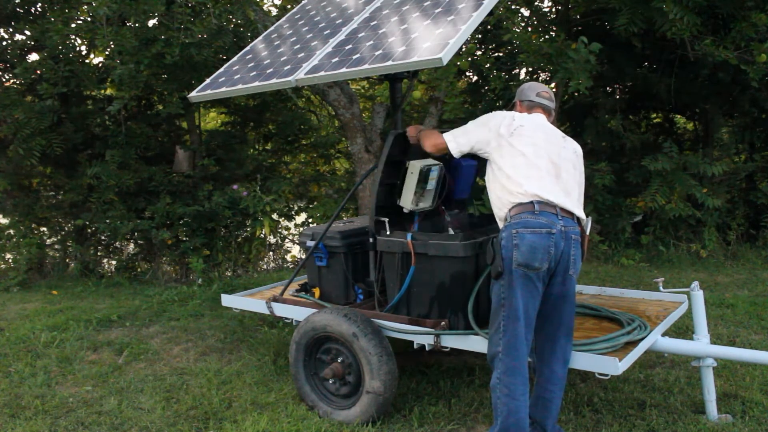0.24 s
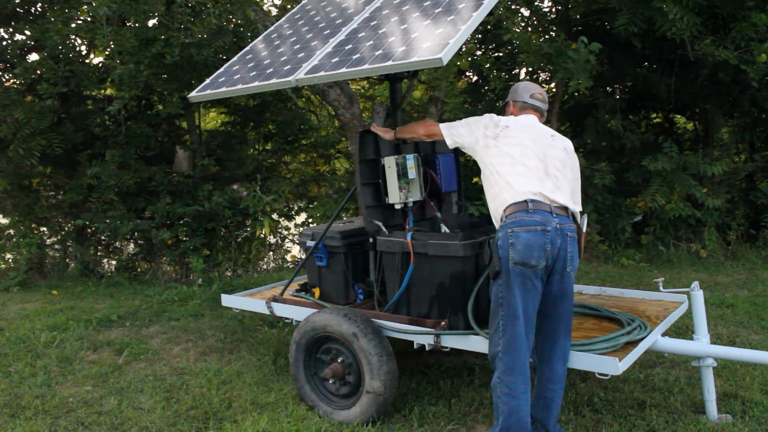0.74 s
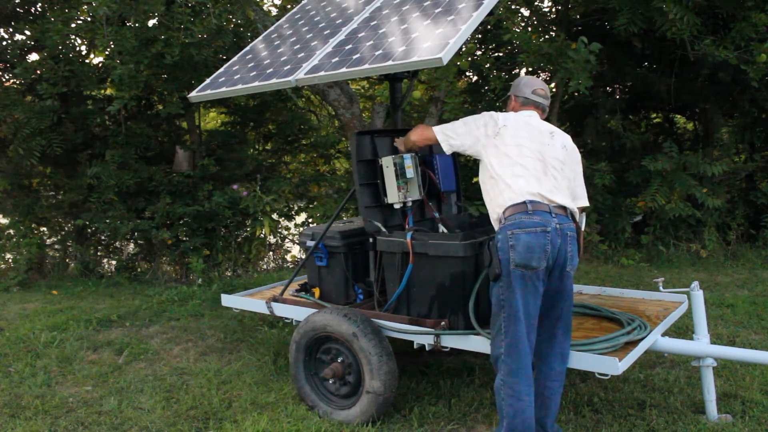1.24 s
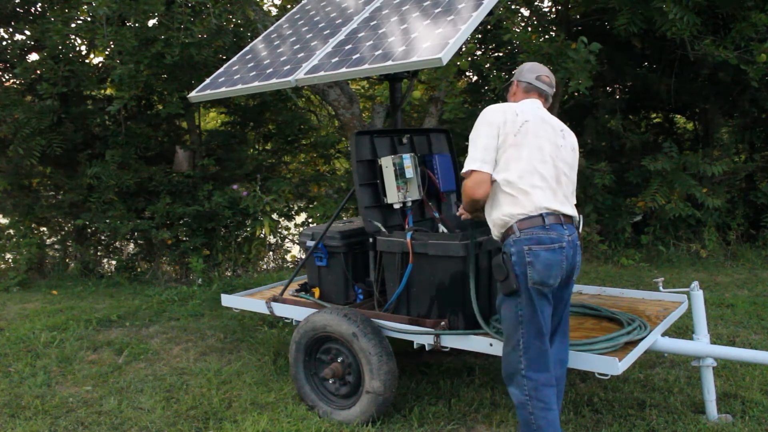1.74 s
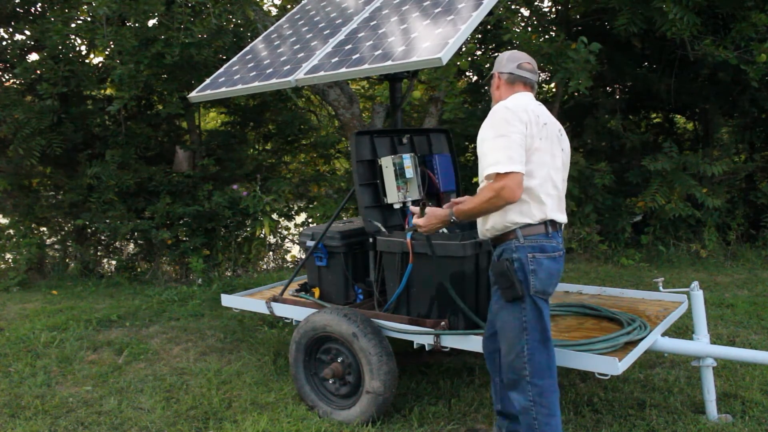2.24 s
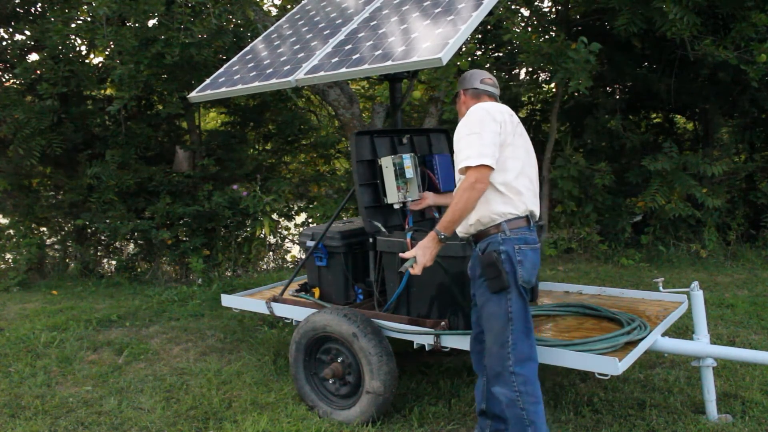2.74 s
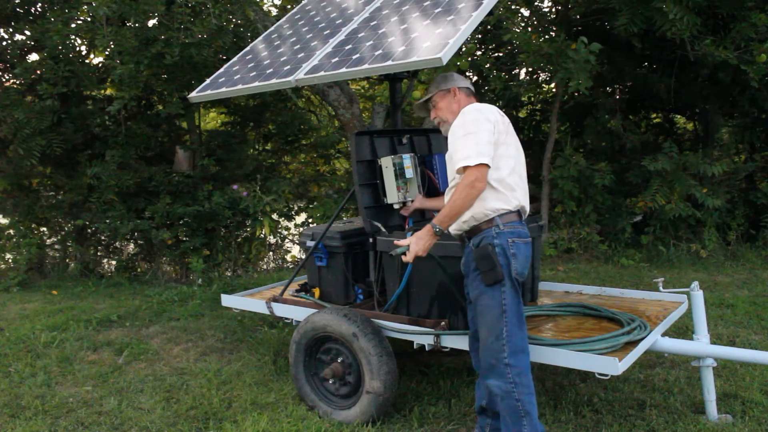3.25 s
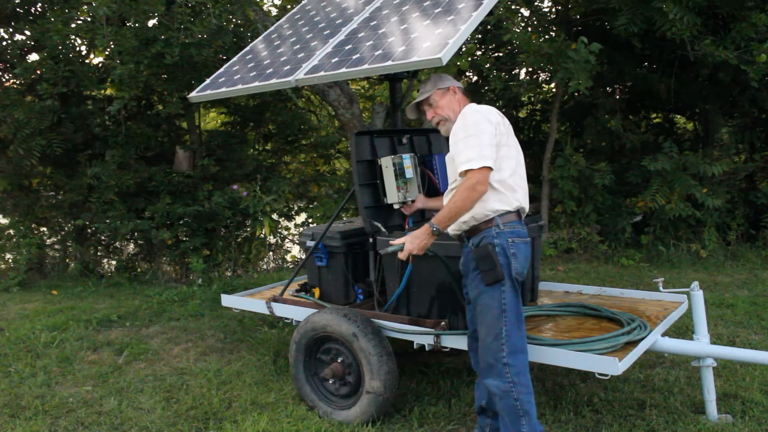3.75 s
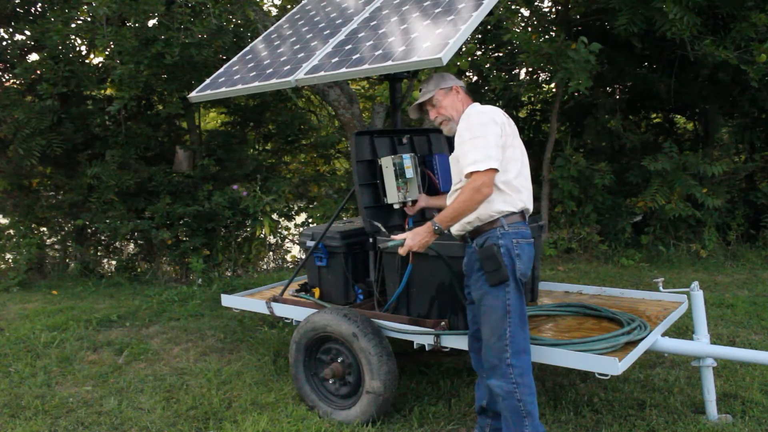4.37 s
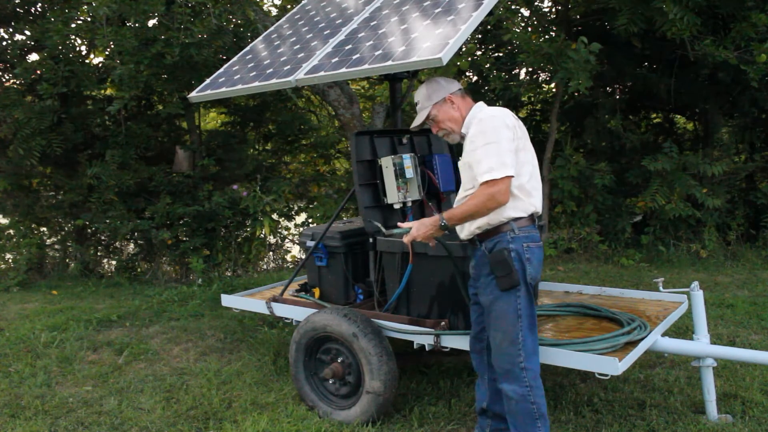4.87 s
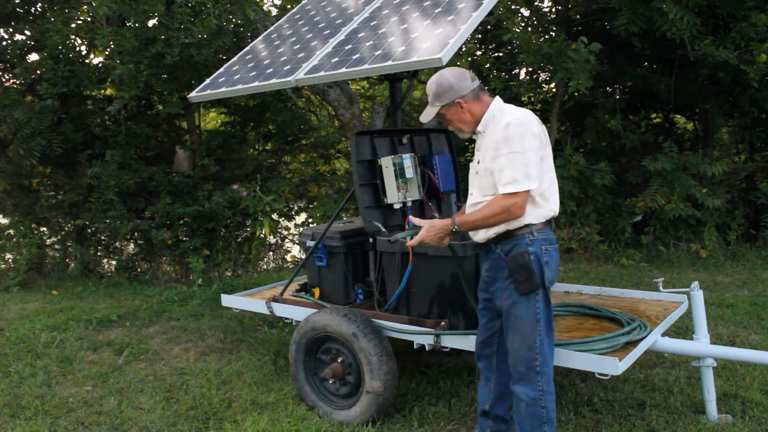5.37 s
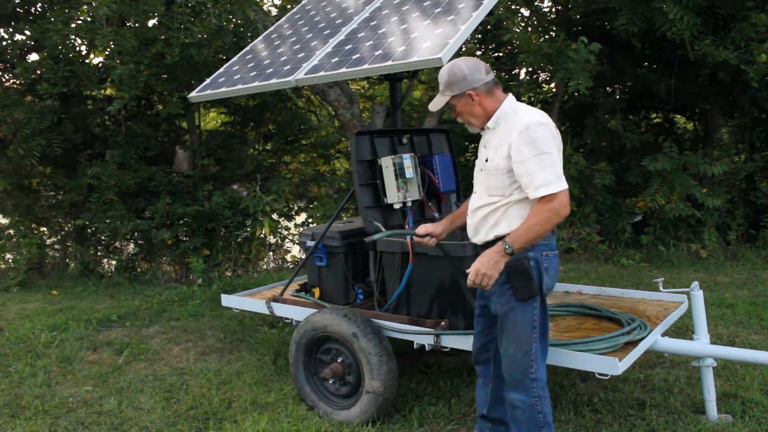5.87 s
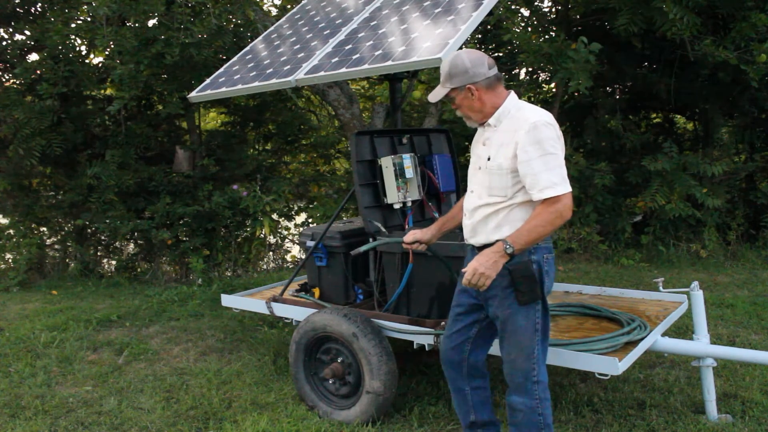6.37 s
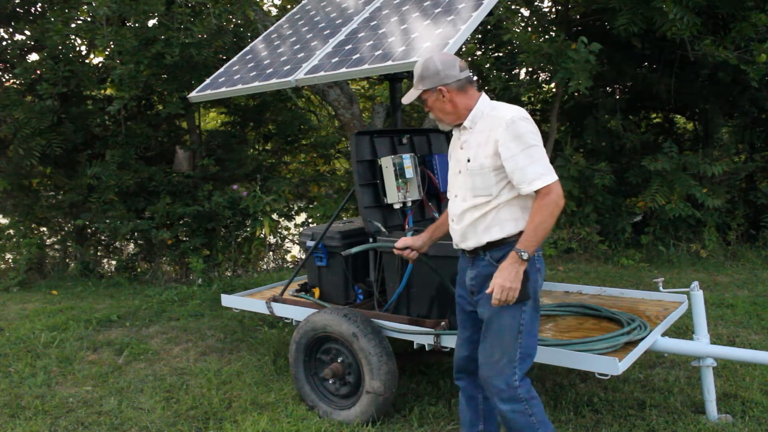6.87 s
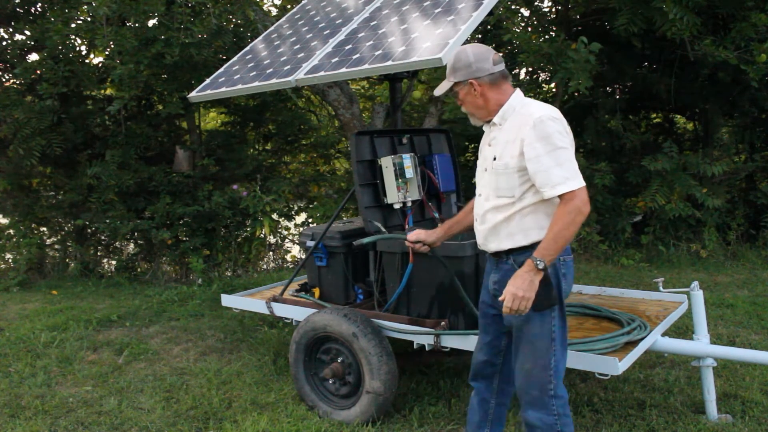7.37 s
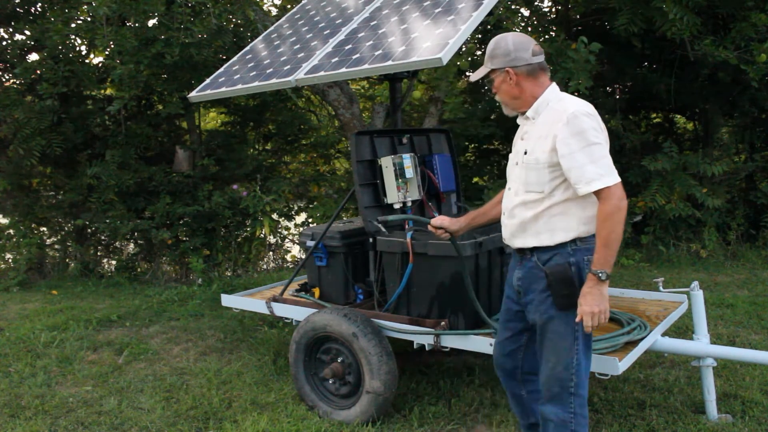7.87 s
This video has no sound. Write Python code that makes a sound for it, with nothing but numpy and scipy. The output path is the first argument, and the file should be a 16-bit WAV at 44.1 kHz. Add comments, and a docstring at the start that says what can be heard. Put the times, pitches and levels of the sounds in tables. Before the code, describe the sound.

Crickets and katydids sing steadily outdoors while a plastic box lid knocks open, followed by a few light snaps and rustles.

```python
"""Dusk on a lawn, heard through one microphone. From the start, crickets and katydids scrape their
wings in the hedge, over evening air and a far road; thin peeps come now and then from the trees.
A man swings open the lid of a plastic battery box on a trailer: the hinge rubs and the box knocks.
Then a hose fitting snaps, his clothes and shoes rustle, and the hose creaks faintly as he twists it.
Near the end a low hum passes far away, followed by a few more snaps and knocks."""
import sys
import numpy as np
from scipy import signal
from scipy.fft import rfft, irfft, next_fast_len
from scipy.io import wavfile

SR = 44100
rng = np.random.default_rng(int(sys.argv[2]) if len(sys.argv) > 2 else 0)


def pcm_store(signal):
    """Save signal as 16-bit PCM."""
    levels = np.round(np.clip(np.atleast_2d(signal), -1, 1) * 32767)
    wavfile.write(sys.argv[1], SR, levels.astype(np.int16).T)


N = 357651
TIME = np.arange(N) / SR


def gain_of(db):
    return 10 ** (np.asarray(db) / 20)


def unit_power(x):
    return x / np.sqrt(np.mean(x ** 2) + 1e-20)


def add(mix, start_s, sound):
    part = mix[max(round(start_s * SR), 0):][:len(sound)]
    part += sound[:len(part)]


def sine(hz):
    """A tone that follows a changing pitch."""
    return np.sin(2 * np.pi * np.cumsum(hz) / SR)


def noise(spectrum):
    """Noise of unit power, shaped by rows of pitch_hz, relative_db."""
    size = next_fast_len(N)
    hz, db = np.transpose(spectrum)
    shape = gain_of(np.interp(np.log(np.fft.rfftfreq(size, 1 / SR) + 1), np.log(hz), db))
    return unit_power(irfft(rfft(rng.standard_normal(size)) * shape, size)[:N])


def wander(per_s):
    """A random drift that heads for a new value per_s times a second."""
    return np.interp(TIME * per_s, np.arange(2048), rng.standard_normal(2048))


def band(x, low_hz, high_hz, order=2):
    return signal.sosfilt(signal.butter(order, [low_hz, high_hz], "band", fs=SR, output="sos"), x)


def hedge(x, tail_s, tail_db):
    """Leaves and trunks scatter a sound into a short tail that fades by 60 dB in tail_s."""
    t = TIME[:SR // 2]
    tail = rng.standard_normal(len(t)) * gain_of(-60 * t / tail_s)
    return x + gain_of(tail_db) * signal.oaconvolve(x, tail / np.linalg.norm(tail))[:N]


def evening_air(level_db=-44.5):
    """A steady hiss: the air and the blur of the farthest insects."""
    # the tone of the hiss: pitch_hz, relative_db
    spectrum = [(25, -30), (60, -4.5), (150, -3), (450, -4.5), (1200, -8), (2500, -10.5), (3800, -10.5),
                (4500, 4), (5600, -4.5), (6600, -8.5), (7600, 13), (9300, 3), (10500, -8.5), (16000, -28)]
    return gain_of(level_db) * noise(spectrum)


def traffic(road_db=-73.5):
    """A far road rumbles, swelling as each vehicle goes by."""
    # passing vehicles: nearest_s, swell_s, level_db
    passes = [(0.1, 1.35, -59.5), (3.65, 0.72, -63.5), (8.2, 0.76, -64.5)]
    power = gain_of(road_db) ** 2
    for nearest_s, swell_s, db in passes:
        power += gain_of(db) ** 2 * np.exp(-((TIME - nearest_s) / swell_s) ** 2)
    rumble = noise([(50, -18), (110, -3.5), (160, 4), (230, -6), (500, -11), (2000, -42.5)])
    return np.sqrt(power) * rumble


def wing_strokes(cycles, top_hz, fall_hz, share):
    """A scraper slows along the wing's ridges for a share of each cycle, so each note falls."""
    progress = np.minimum(cycles % 1 / share, 1)
    swell = np.minimum(2 * np.sin(np.pi * progress), 1)
    return swell * sine(top_hz - fall_hz * progress), progress


def chirp_count(first_s, start_per_s, end_per_s):
    """Chirps sung so far by a cricket whose pace changes evenly."""
    return np.cumsum(np.linspace(start_per_s, end_per_s, N)) / SR - first_s * start_per_s


def near_cricket(chirps, top_hz, fall_hz, share, start_db, end_db):
    """A cricket scrapes its wings close by; each chirp flutters, falls and fades."""
    notes, progress = wing_strokes(chirps, top_hz + 55 * wander(220), fall_hz, share)
    notes *= gain_of(3 * wander(110) - 9 * progress)
    return gain_of(np.linspace(start_db, end_db, N)) * unit_power(hedge(notes, tail_s=.075, tail_db=0))


def chirp_swells(chirps, share):
    """The loudness rises, holds and falls around each whole count of chirps."""
    distance = np.abs((chirps + .5) % 1 - .5)
    return unit_power(np.clip(2 - 4 * distance / share, 0, 1))


def field_cricket(swell, top_hz, fall_hz=700):
    """Each chirp is a swell of a few wing strokes, each a falling note."""
    cycles = TIME * 22 * rng.uniform(.8, 1.2) + .4 * wander(4)
    notes, progress = wing_strokes(cycles, top_hz + 25 * wander(60), fall_hz * (cycles % 1 + .3), .72)
    return swell * unit_power(notes * gain_of(2 * wander(20) - 5 * progress ** 2))


def field_crickets(crowd_size=6):
    """Three crickets keep their own paces, a nearer one chirps unevenly, and a crowd sings behind."""
    # the three crickets: first_chirp_middle_s, start_chirps_per_s, end_chirps_per_s, top_pitch_hz
    singers = [(.055, 2.588, 2.588, 5110), (.385, 2.17, 3.03, 5080), (.31, 1.685, 1.685, 4720)]
    # the nearer one's chirps: middle_s, relative_db
    lone_chirps = [(.35, -54), (.88, -51), (2.68, -48.5), (3.27, -46), (3.75, -48), (4.38, -47),
                   (4.92, -49), (5.72, -47), (6.34, -51), (6.93, -50), (7.95, -48.5)]
    out, lone_swell, chirp_s = np.zeros(N), np.zeros(N), .16
    for *pace, top_hz in singers:
        out += gain_of(-56.5) * field_cricket(chirp_swells(chirp_count(*pace), share=.45), top_hz)
    one_swell = signal.windows.tukey(round(chirp_s * SR), .7)
    for middle_s, db in lone_chirps:
        add(lone_swell, middle_s - chirp_s / 2, gain_of(db) * one_swell)
    out += field_cricket(lone_swell, top_hz=4740, fall_hz=329.3)
    for k in range(crowd_size):
        swell = chirp_swells(TIME * rng.uniform(2.2, 3.4) + rng.random(), share=1.15)
        song = field_cricket(swell, top_hz=4998 - 330 * k / crowd_size)
        out += gain_of(-51) / np.sqrt(crowd_size) * song
    return hedge(out, tail_s=.2, tail_db=-2) / np.sqrt(2)


def buzz(strokes_per_s, sharpness):
    """The swell of each wing stroke in a katydid's buzz."""
    cycles = TIME * strokes_per_s + .0514 * wander(1.1)
    return unit_power(np.exp(sharpness * np.cos(2 * np.pi * cycles)))


def katydids(conehead_db=-47, meadow_db=-48, stop_s=3.97):
    """Two conehead katydids buzz their wings without pause; a meadow katydid whirrs and stops."""
    # the rasp of each kind's wings: pitch_hz, relative_db
    conehead_rasp = [(7000, -41), (9000, -4.5), (10500, -5.5), (12000, 1.5), (13200, 3.5), (14400, 6),
                     (15600, 2), (16500, -32)]
    meadow_rasp = [(9000, -45), (11500, -5), (13000, -1), (14600, 3.5), (15600, 6), (16500, -17)]
    coneheads = noise(conehead_rasp) * buzz(177.8, .25) + noise(conehead_rasp) * buzz(184.1, .27)
    meadow = noise(meadow_rasp) * buzz(30.9, .96) * np.clip((stop_s - TIME) / .02, 0, 1)
    return gain_of(conehead_db) * coneheads + gain_of(meadow_db) * meadow


def choir(hz, spread_hz, fall_hz, strokes_per_s, count):
    """Several trilling crickets, each with its own pitch and pace."""
    out = np.zeros(N)
    for offset in np.linspace(-1, 1, count):
        cycles = TIME * strokes_per_s * rng.uniform(.8, 1.2) + rng.random() + .3 * wander(12)
        top_hz = hz + offset * spread_hz + fall_hz / 2 + 45 * wander(60)
        notes, _ = wing_strokes(cycles, top_hz, fall_hz, share=.7)
        out += notes / (1 + offset ** 2)
    return unit_power(hedge(out, tail_s=.4, tail_db=-2))


def far_crickets():
    """Five choirs of far crickets blend into a steady ringing."""
    # choirs: pitch_hz, spread_hz, fall_per_stroke_hz, typical_strokes_per_s, level_db
    choirs = [(3090, 30, 120, 48, -69), (3324, 40, 100, 55, -69.5), (5990, 220, 260, 40, -64),
              (7833, 250, 450, 42, -45.5), (9090, 480, 650, 46, -48.5)]
    return sum(gain_of(db) * choir(*song, count=6) for *song, db in choirs)


def high_trill():
    """Two crickets trill very high and grow louder."""
    # the trill's loudness: time_s, level_db
    levels = [(0, -61), (4.4, -57.5), (5.2, -54.5), (6.5, -50.5), (8.11, -50)]
    swell = gain_of(np.interp(TIME, *np.transpose(levels)))
    return swell * choir(hz=9850, spread_hz=40, fall_hz=220, strokes_per_s=60, count=2)


def friction(rubs, spectrum, grain_db):
    """Strokes of uneven, grainy rubbing, from two places of contact."""
    swell = np.zeros(N)
    for start_s, length_s, db in rubs:
        add(swell, start_s, gain_of(db) * signal.windows.tukey(round(length_s * SR), .7))
    contacts = [noise(spectrum) * gain_of(grain_db * np.tanh(wander(170))) for _ in range(2)]
    return swell * unit_power(sum(contacts))


def hinge():
    """The lid rubs on its hinge as it swings."""
    # rubs: start_s, length_s, level_db
    rubs = [(0.14, 0.13, -55), (0.37, 0.13, -48.5), (0.68, .12, -53.5), (0.79, 0.086, -53),
            (0.93, 0.1, -51.5), (1.10, 0.085, -57.5)]
    spectrum = [(50, -22), (170, -4), (300, -2), (450, .5), (750, -10.5), (1500, -12.5),
                (5000, -40), (12000, -50)]
    return friction(rubs, spectrum, grain_db=8)


def peeps(length_s=.053, rise_hz=780):
    """Short rising notes from deep in the trees."""
    # thin peeps: start_s, start_pitch_hz, level_db
    notes = [(0.28, 6200, -57), (1.17, 6200, -54), (2.97, 6300, -58), (3.10, 6200, -58), (3.31, 3400, -66),
             (3.665, 6260, -55), (5.37, 3500, -57), (5.499, 6250, -57)]
    out, size = np.zeros(N), round(length_s * SR)
    for start_s, hz, db in notes:
        add(out, start_s, gain_of(db) * np.hanning(size) * sine(hz + np.linspace(0, rise_hz, size)))
    return hedge(out, tail_s=.13, tail_db=0)


def box_knocks(lid_rise_s=.0011, wall_rise_s=.0034, echo_s=.0088):
    """The stiff lid clacks and rattles, its edge ticks, and the hollow walls answer with a thud."""
    # blows on the box: start_s, thud_db, clack_db, clack_pitch_hz, tick_db
    blows = [(0.399, -40, -47, 1390, -48), (0.574, -35.5, -36.5, 1480, -33), (0.888, -18.5, -28, 1140, -31),
             (0.931, -32.5, -62, 1400, -34.5), (0.965, -46, -40, 1380, -39),
             (1.3865, -30.5, -28, 1350, -52), (1.399, -26, -19.5, 1305, -31), (1.6737, -52, -21, 1310, -65),
             (1.6772, -19, -7.5, 1347, -18), (3.469, -40.5, -39, 980, -46), (3.660, -50, -46, 845, -49),
             (4.040, -38, -32, 1120, -26.5), (4.344, -49.5, -49, 990, -65), (5.142, -65, -45.5, 1220, -70),
             (7.572, -58, -57, 1500, -33), (7.592, -46, -45, 990, -46), (7.814, -40, -36.5, 1370, -60),
             (7.963, -65, -63, 1400, -39), (8.019, -68, -41.5, 1240, -60), (8.061, -60, -41, 1310, -61)]
    # the notes the hollow box rings at: pitch_hz, relative_db, ring_s (time to fade by 60 dB)
    box_notes = [(72, -25.5, 0.17), (102, -17.5, 0.11), (118.5, -15, 0.12), (150.5, -7, 0.17),
                 (183, -5, 0.16), (253.5, -1.5, 0.075), (272.7, -1, 0.1), (332, -5, 0.094),
                 (394, -4.5, 0.096), (451, -2.5, 0.089), (579, -3, 0.069), (722, -11.5, 0.084),
                 (806, -20.5, 0.085)]
    t = TIME[:SR // 3]
    rings = np.array([(-1) ** k * gain_of(db - 60 * t / ring_s) * np.sin(2 * np.pi * hz * t)
                      for k, (hz, db, ring_s) in enumerate(box_notes)])
    is_deep = np.array(box_notes)[:, 0] < 135
    clack_swell = (t / lid_rise_s) ** 2 * np.exp(2 - 2 * t / lid_rise_s)
    body, lid = np.zeros(N), np.zeros(N)
    for start_s, thud_db, clack_db, hz, tick_db in blows:
        lid_noise, edge_noise, box_noise = rng.standard_normal((3, len(t)))
        walls = gain_of(-7 + .54 * (thud_db - clack_db) * is_deep) @ rings  # dull blows rock the box
        shudder = unit_power(band(box_noise, 122, 590)) * gain_of(-8 - 60 * t / .11)
        add(body, start_s, gain_of(thud_db) * (walls + shudder) * (1 - np.exp(-t / wall_rise_s)))
        clack = clack_swell * (np.sin(2 * np.pi * hz * t) + .2 * np.sin(2 * np.pi * 1.5 * hz * t))
        panel = band(lid_noise, .76 * hz, 1.03 * hz) + .2 * band(box_noise, 1.3 * hz, 1.55 * hz)
        rattle = unit_power(panel) * gain_of(-14 - 60 * t / .084) * (1 - np.exp(-t / .0023))
        tick = .5 * unit_power(band(edge_noise, 1500, 6500)) * np.exp(-t / .0014)
        tick_tail = unit_power(band(edge_noise, 1100, 3760, order=3)) * gain_of(-10 - 60 * t / .06)
        add(lid, start_s, gain_of(clack_db) * (clack + rattle) + gain_of(tick_db) * (tick + tick_tail))
        add(lid, start_s + echo_s, gain_of(clack_db - 15) * clack)  # a quick echo off the ground
    return hedge(body, tail_s=.66, tail_db=-17.5) + hedge(lid, tail_s=.41, tail_db=-18)


def fitting_snaps(bounce_s=.00492, bounce_db=-4):
    """The hose fitting seats with a hollow snap and bounces once."""
    # snaps: start_s, level_db
    snaps = [(2.109, -46), (4.039, -42.5), (7.522, -46.5), (7.570, -56.5)]
    # the notes the fitting rings at: pitch_hz, relative_db, ring_s (time to fade by 60 dB)
    notes = [(483, -9, 0.092), (684, 1.5, 0.057), (1220, -10.5, 0.063), (3140, 2.5, 0.03),
             (3790, 3.5, 0.033), (5340, -2, 0.025), (6500, -1, .02)]
    t, out = TIME[:SR // 6], np.zeros(N)
    ring = sum(gain_of(db - 60 * t / ring_s) * np.sin(2 * np.pi * hz * t) for hz, db, ring_s in notes)
    for start_s, db in snaps:
        add(out, start_s, gain_of(db) * ring)
        add(out, start_s + bounce_s, gain_of(db + bounce_db) * band(ring, 820, 8000))
    return out


def clothes():
    """Clothes and shoes brush the grass."""
    # rustles: start_s, length_s, level_db
    rustles = [(2.52, 0.098, -57), (6.17, 0.23, -54.5), (6.36, 0.18, -54.5), (6.66, .1, -55),
               (6.88, 0.21, -54.5), (7.48, 0.25, -55), (7.78, 0.37, -56.5)]
    spectrum = [(50, -32), (300, 5), (1200, 3.5), (3500, 0), (8000, -1.5), (15000, -20)]
    return friction(rustles, spectrum, grain_db=4.5)


def hose_creak(sag_hz=6.2):
    """Rubber sticks and slips so fast that it makes a thin note, which sags in each twist."""
    # twists of the hose: start_s, length_s, start_slips_per_s, level_db
    twists = [(3.802, 0.29, 220, -67.5), (4.135, 0.13, 237, -60), (4.269, 0.25, 236, -65),
              (4.519, 0.62, 260, -72.5)]
    # the creak's overtones: multiple_of_slip_rate, relative_db
    overtones = [(2, -6), (3, -9), (4, -3), (5, 0), (6, -1), (7, -3), (8, -9)]
    out = np.zeros(N)
    for start_s, length_s, start_hz, level_db in twists:
        size = round(length_s * SR)
        slip_hz = (start_hz - np.linspace(0, sag_hz, size)) * (1 + .003 * wander(23)[:size])
        slips = np.cumsum(slip_hz) / SR
        tone = unit_power(sum(gain_of(db) * np.cos(2 * np.pi * k * slips) for k, db in overtones))
        add(out, start_s, gain_of(level_db) * tone * signal.windows.tukey(size, .4))
    return hedge(out, tail_s=.25, tail_db=-14)


def far_hum(pitch_hz=91.5, peak_db=-67, peak_s=6.95):
    """A low hum swells and fades in the distance."""
    swell = np.exp(-((TIME - peak_s) / .8) ** 2)
    return gain_of(peak_db) * swell * unit_power(sine(pitch_hz + wander(8)))


def scene():
    """Insects, evening air and the work at the trailer, all at one microphone."""
    # two near crickets drift in and out of step; the higher one fades as the lower one grows
    insects = near_cricket(chirp_count(first_s=-.005, start_per_s=7.22, end_per_s=7.08),
                           top_hz=8295, fall_hz=720, share=.66, start_db=-47.5, end_db=-51.5)
    insects += near_cricket(chirp_count(first_s=.027, start_per_s=7.398, end_per_s=7.398),
                            top_hz=7975, fall_hz=380, share=.54, start_db=-53, end_db=-45)
    insects += field_crickets() + katydids() + far_crickets() + high_trill()
    background = evening_air() + traffic() + peeps() + far_hum()
    work = hinge() + box_knocks() + fitting_snaps() + clothes() + hose_creak()
    mono = insects + background + work
    return np.array([mono, mono])


def record(dry, top_hz=15780):
    """The recorder cuts off the highest treble."""
    low_pass = signal.firwin(1023, top_hz, window=("kaiser", 9), fs=SR)
    return signal.oaconvolve(dry, low_pass[None], "same", axes=1)


dry = scene()
out = record(dry)
pcm_store(out)
```